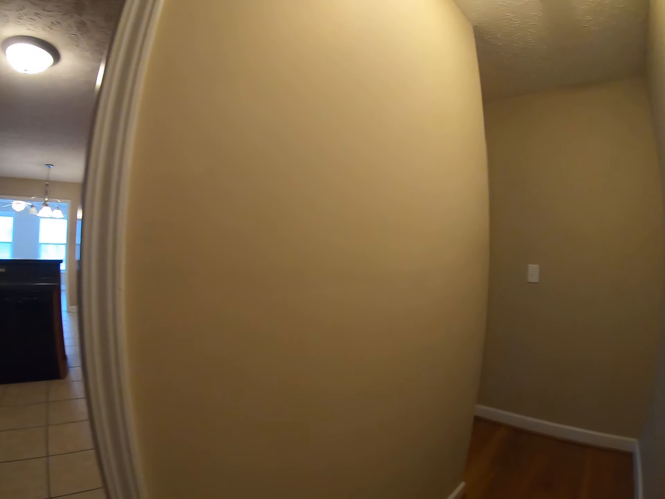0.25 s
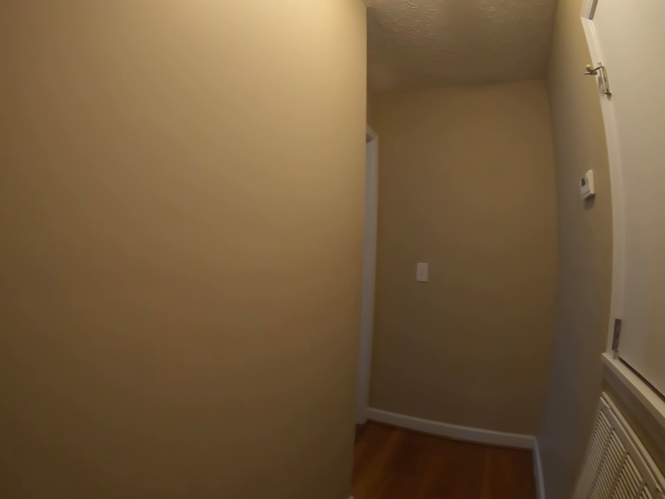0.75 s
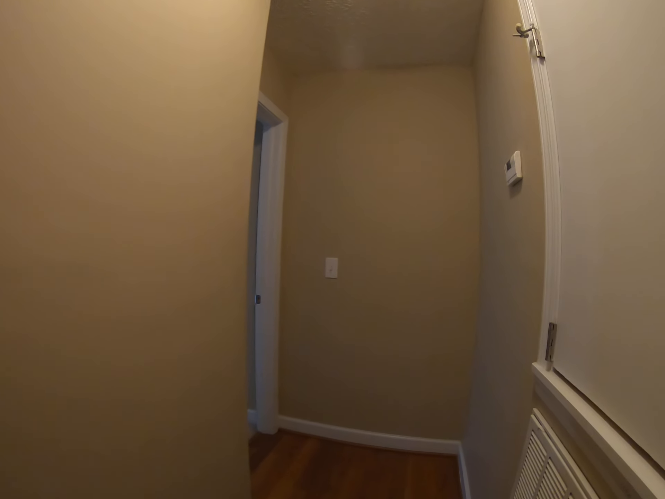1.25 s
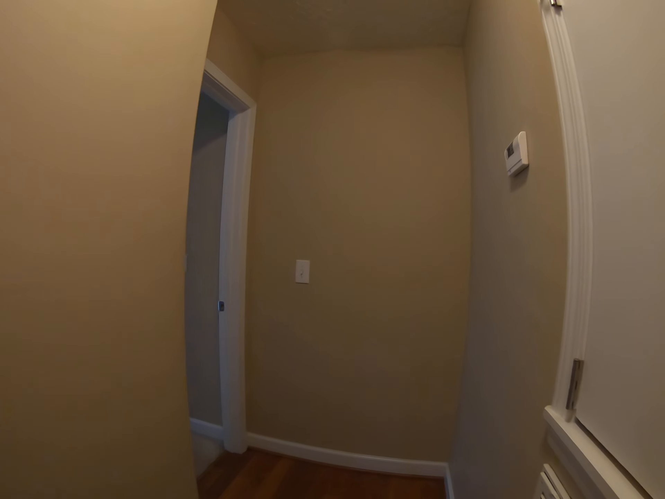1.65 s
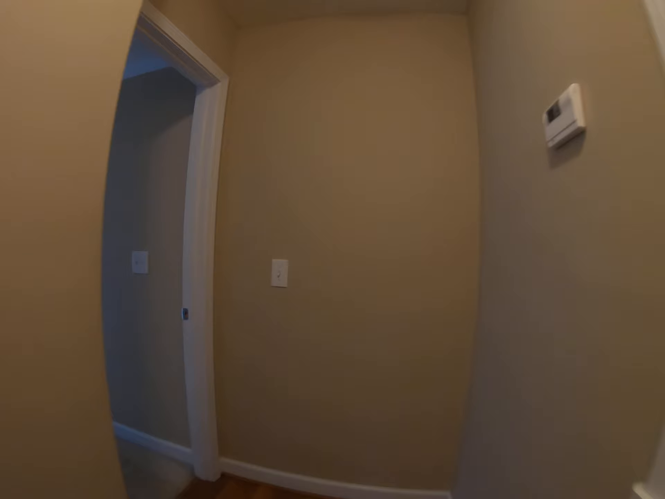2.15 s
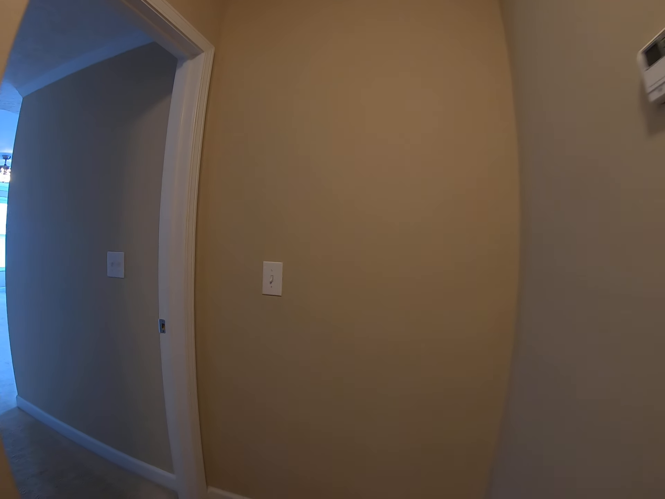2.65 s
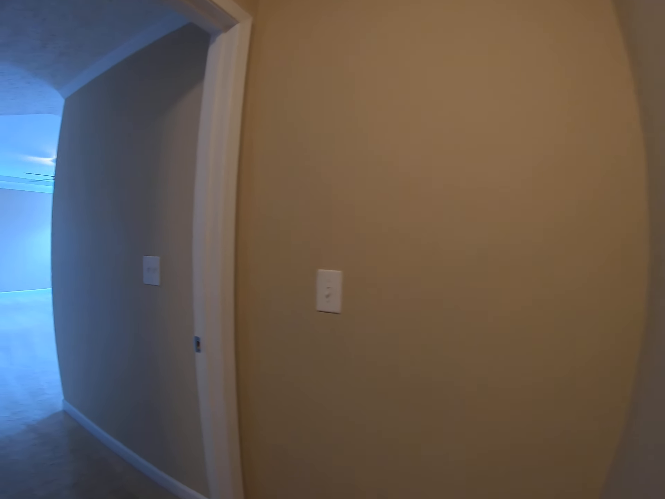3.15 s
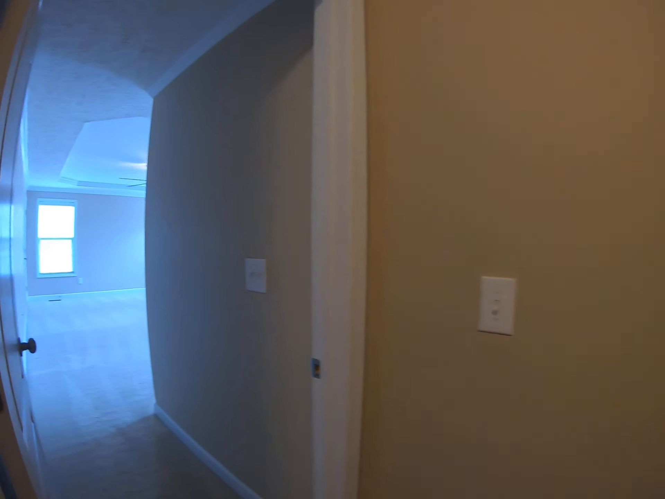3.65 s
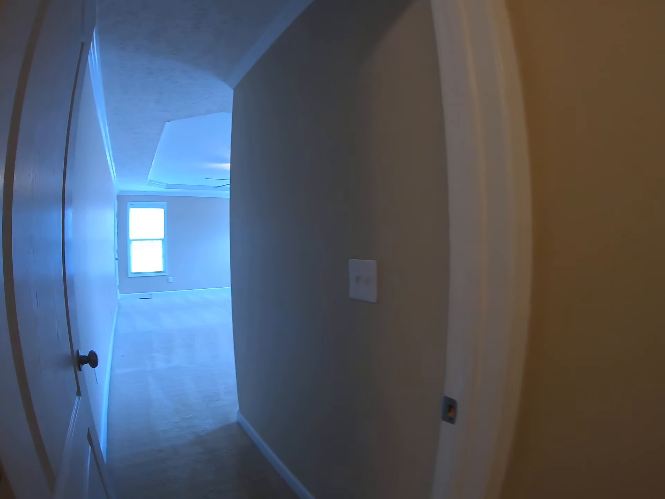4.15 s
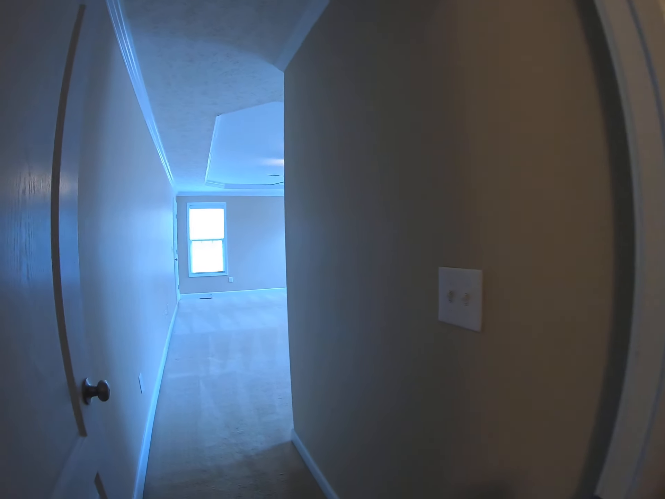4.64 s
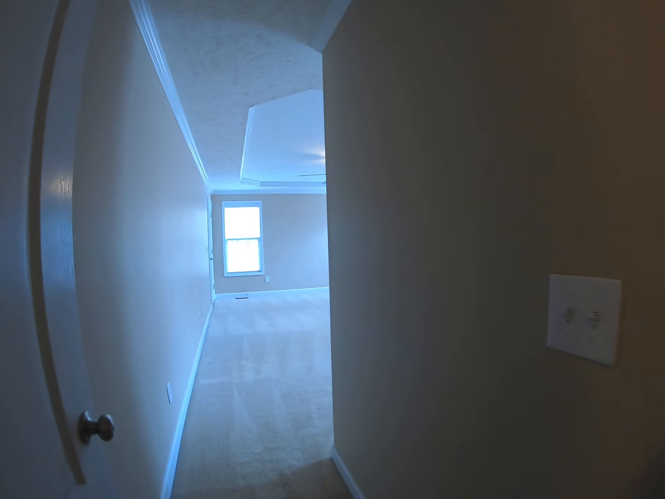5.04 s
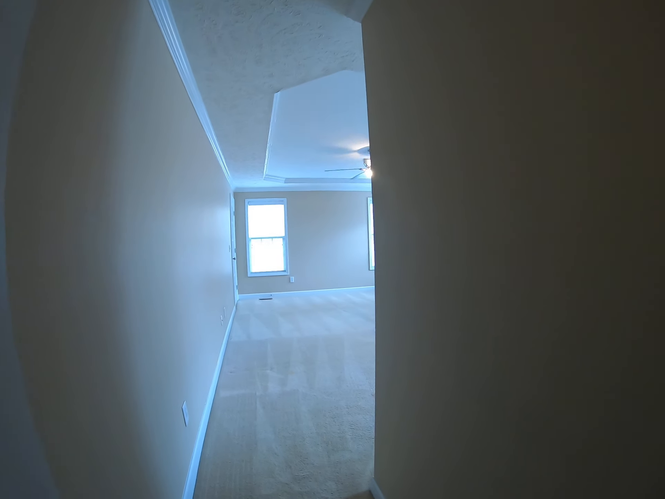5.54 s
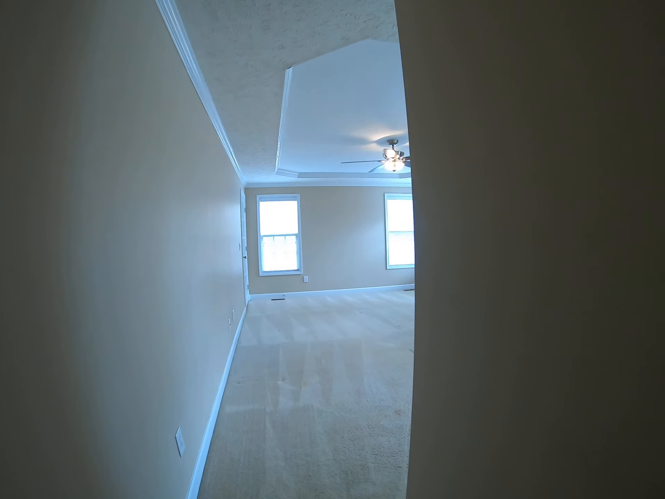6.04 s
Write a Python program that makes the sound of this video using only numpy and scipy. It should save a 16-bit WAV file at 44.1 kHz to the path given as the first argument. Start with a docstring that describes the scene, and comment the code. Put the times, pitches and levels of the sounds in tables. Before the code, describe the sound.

Slow, dull footsteps thud along a wooden hallway floor in an empty house, with shoe clicks and scuffs over a faint wavering high hum.

```python
"""A low ventilation rumble comes first; then someone walks slowly down the wooden hallway of an empty house.
Heel and forefoot thud on the sprung floor, made of decaying sine modes with knocks of grainy noise.
The shoes click, clack and scuff with bursts of noise, and the bare walls ring briefly.
Under it lie a far appliance's hum and a thin wavering tone near 1 kHz, probably the stabiliser motor
of a camera the walker carries. The rumble and hum fade as they are left behind."""
import sys
import numpy as np
from scipy import signal
from scipy.fft import rfft, irfft, next_fast_len
from scipy.io import wavfile

SR = 44100
rng = np.random.default_rng(int(sys.argv[2]) if len(sys.argv) > 2 else 0)


def generate_wav(sig):
    """Save sig (samples, or channels by samples) to the path in sys.argv[1] as 16-bit PCM at SR."""
    pcm = np.round(np.clip(np.atleast_2d(sig).T, -1, 1) * 32767).astype(np.int16)
    wavfile.write(sys.argv[1], SR, pcm)


N = 277429
TIME = np.arange(N) / SR  # seconds


def gain_of(db):
    """Turns decibels into an amplitude factor."""
    return 10 ** (np.asarray(db) / 20)


def evened(x):
    """Scales a signal to an rms (average strength) of 1."""
    return x / np.sqrt(np.mean(x ** 2) + 1e-20)


def read(points, hz):
    """Reads a table between its points, over log frequency."""
    table_hz, value = np.transpose(points)
    return np.interp(np.log(hz + 1), np.log(table_hz + 1), value)


def add(mix, s, sound):
    """Mixes a sound in, starting at s seconds."""
    part = mix[..., max(round(s * SR), 0):][..., :sound.shape[-1]]
    part += sound[..., :part.shape[-1]]


def coloured(x, points, tilt_db=0):
    """Filters by a table of levels, tilted in dB per octave; white noise keeps its power."""
    size = next_fast_len(x.shape[-1] + 2048)
    hz = np.fft.rfftfreq(size, 1 / SR)
    gain = gain_of(read(points, hz) + tilt_db * np.log2(hz + 1))
    return irfft(rfft(x, size) * evened(gain), size)[..., :x.shape[-1]]


def paired(x, alike):
    """Blends two unrelated channels to a given likeness in each band."""
    size = next_fast_len(x.shape[-1])
    a, b = rfft(x, size)
    same = np.clip(read(alike, np.fft.rfftfreq(size, 1 / SR)), -1, 1)
    mid = a * np.sqrt((1 + same) / 2)
    side = b * np.sqrt((1 - same) / 2)
    return irfft(np.array([mid + side, mid - side]), size)[:, :x.shape[-1]]


def drift(per_s):
    """Random wandering of rms 1 that picks a new target per_s times a second."""
    knots = rng.standard_normal(4096)
    return evened(np.interp(TIME * per_s, np.arange(len(knots)), knots))


def wandering_tone(hz, waver_hz):
    """A complex tone whose pitch wavers at random."""
    return np.exp(2j * np.pi * np.cumsum(hz + waver_hz * drift(per_s=30)) / SR)


# How alike left and right are in the room. Each row: frequency in Hz, likeness (1 is identical).
ROOM_ALIKE = [(100, 0.98), (220, 0.99), (450, 0.91), (900, 0.52), (2000, 0.53), (3600, 0.72), (5500, 0.45),
              (9000, 0)]


def grit(count, spread_db):
    """Two channels of noise broken into half-millisecond grains of uneven size."""
    grain_sizes = gain_of(spread_db * rng.standard_normal(count // 22 + 1))
    sizes = np.repeat(grain_sizes, 22)[:count]
    return evened(paired(rng.standard_normal((2, count)), ROOM_ALIKE) * sizes)


def ring(modes, scale, contact_s):
    """Floor modes swell over the contact time, then die away; the peak is 1."""
    t = np.arange(SR // 2) / SR
    wave = 0
    for hz, db, t60 in modes:
        wave = wave + gain_of(db - 60 * t / t60) * np.sin(2 * np.pi * hz * scale * t)
    wave = wave * (1 - np.exp(-(t / contact_s) ** 2))
    return -wave / abs(wave).max()


# How long the bare hallway rings. Each row: frequency in Hz, time to fall by 60 dB in seconds.
HALLWAY_RING = [(70, 0.11), (160, 0.71), (400, 1), (1000, 0.39), (2500, 0.71), (5000, 0.8), (9000, 0.54),
                (14000, 0.41)]


def hall(x, gap_s):
    """Dense reflections from bare walls build up over the gap; each band dies at its own speed."""
    noise = paired(rng.standard_normal((2, SR)), ROOM_ALIKE)
    hz, t, bands = signal.stft(noise, SR, nperseg=512)
    fade = gain_of(-60 * t / read(HALLWAY_RING, hz)[:, None])
    tail = signal.istft(bands * fade, SR, nperseg=512)[1]
    tail = tail * (1 - np.exp(-(TIME[:tail.shape[1]] / gap_s) ** 2))
    return signal.fftconvolve(np.atleast_2d(x), tail / np.linalg.norm(tail[0]), axes=1)[:, :N]


# The steps, with levels before the trims of each layer. Each row: heel strike in seconds, heel level in dB,
# level in dB as the foot rolls flat, roll from heel to ball in seconds, ball level in dB,
# knock of the ball in dB, pitch of the ball's clack in Hz, board pitch in Hz, give of the joists in dB.
STEPS = [(0.414, -28, -37, 0.15, -34.5, -45.5, 685, 167.3, -2.5),
         (1.241, -19, -34, .11, -23.5, -43, 1280, 160.6, -6),
         (2.012, -15.5, -47, .104, -27.5, -43, 770, 127, -15),
         (2.728, -24.5, -37.5, .137, -30.5, -44, 782, 160.4, -2.5),
         (3.5, -35, -45, 0.1, -26, -41, 830, 153, -2.5),
         (4.315, -20.5, -33.5, .151, -26, -49, 480, 145.7, -3.5),
         (5.116, -19.5, -27, .105, -31, -44.5, 1010, 192.2, -12),
         (5.968, -39.5, -49, 0.081, -39.5, -72, 695, 149.5, -1.5)]
# woody knock under the cushioned heel and under a mere shift of weight, relative to the thud
HEEL_KNOCK_DB, SHIFT_KNOCK_DB = -25.5, -25
FLAT_SHARE = 0.51  # how far through the roll the foot goes flat
FLOOR_HZ = 147.1  # a flat foot spreads its weight over many boards and rings the floor's main pitch
# the whole weight comes onto the front foot: typical delay after the heel, level relative to the ball
SETTLE_S, SETTLE_DB = .335, -15


def footfalls():
    """Each step loads the floor four times; rows of (s, board dB, joist dB, knock dB, board pitch Hz)."""
    rows = []
    for s, heel_db, flat_db, roll_s, ball_db, ball_knock_db, _, spot_hz, give_db in STEPS:
        settle_s = s + SETTLE_S + rng.uniform(-.02, 0.023)
        heel = s, heel_db, heel_db + HEEL_KNOCK_DB, spot_hz
        flat = s + FLAT_SHARE * roll_s, flat_db, flat_db + SHIFT_KNOCK_DB, FLOOR_HZ
        ball = s + roll_s, ball_db, ball_knock_db, spot_hz
        settle = settle_s, ball_db + SETTLE_DB, ball_knock_db + SETTLE_DB, FLOOR_HZ
        for at, db, knock_db, hz in (heel, flat, ball, settle):
            rows.append((at, db, db + give_db, knock_db, hz))
    return rows


# The boards under the foot. Each row: multiple of the board pitch, level in dB, time to fall 60 dB in seconds.
BOARDS = [(.8, -3, 0.089), (1.0, 6, 0.076), (1.33, -5, 0.095), (1.6, -5.5, 0.064)]
# Slow bending of the joists. Each row: frequency in Hz before scaling, level in dB, time to fall 60 dB in seconds.
JOISTS = [(62.8, -12, 0.92), (77.5, 6.5, 0.17), (103.5, 11, 0.11)]
# The soft sole spares the upper modes. Each row: frequency in Hz, gain in dB.
SOLE = [(20, -27), (35, 1), (50, -4.5), (75, 1), (100, -3), (230, 2), (290, -2), (360, -60), (700, -35)]


def thuds(falls):
    """Each footfall bends the joists and rings the boards, whose pitch depends on the spot."""
    out = np.zeros(N)
    lead_s = .005  # the floor starts to give just before the full weight lands
    for s, board_db, joist_db, _, hz in falls:
        add(out, s - lead_s, gain_of(board_db - 2.5) * ring(BOARDS, hz, contact_s=0.0068))
        add(out, s - lead_s, gain_of(joist_db) * ring(JOISTS, 0.838, contact_s=0.0066))
    size = next_fast_len(N + 4096)
    hz = np.fft.rfftfreq(size, 1 / SR)
    # one echo: a round trip of 0.01362 s between floor and ceiling
    ceiling = 1 + gain_of(-9.0) * np.exp(-2j * np.pi * hz * 0.01362)
    out = irfft(rfft(out, size) * ceiling * gain_of(read(SOLE, hz)), size)[:N]
    return out + gain_of(-7.0) * hall(out, gap_s=0.032)


# Colour of the knock's crunch. Each row: frequency in Hz, relative level in dB per Hz.
KNOCK_COLOUR = [(150, -10), (280, 8), (450, -4.5), (750, -4), (1100, -7.5), (1400, -19), (1900, -13.5),
                (3500, -24), (8000, -43)]
# The hard surface of the flooring. Each row: frequency in Hz before a random scaling, level in dB,
# time to fall 60 dB in seconds.
SURFACE = [(435, -10, 0.19), (611, 2.5, 0.028), (815, -4.5, 0.034), (1067, -16, .04), (1368, -9.5, 0.098)]


def knocks(falls):
    """The sole's contact rings the floor's surface with a short woody knock and a little crunch."""
    out = np.zeros((2, N))
    t = TIME[:8192]
    stroke = (1 - np.exp(-t / 0.0039)) * np.exp(-t / 0.02)
    for s, _, _, knock_db, _ in falls:
        add(out, s - .002, gain_of(knock_db + 1.5) * stroke * grit(len(t), spread_db=2.5))
    out = coloured(out, KNOCK_COLOUR)
    for s, _, _, knock_db, _ in falls:
        knock = ring(SURFACE, rng.uniform(0.91, 1.13), contact_s=0.0021)
        add(out, s - .001, gain_of(knock_db + 1.0) * knock)
    return out + gain_of(-2.0) * hall(out, gap_s=0.0025)


# The shoes snap as they flex. Each row: start in seconds, body level in dB, treble level in dB, before trims.
CLICKS = [(0.549, -38.5, -60), (0.661, -52, -55.5), (1.307, -41, -49.5), (1.464, -40, -61),
          (1.4771, -38, -50), (1.746, -45.5, -66), (2.0214, -46, -51), (2.8024, -42, -55),
          (2.9527, -48, -60), (3.5588, -51, -58), (3.603, -39, -53), (4.3899, -39, -56.5),
          (4.568, -42.5, -46.5), (5.118, -39, -57), (5.221, -45, -58.5), (5.2727, -51, -58.5),
          (5.293, -46, -58), (5.3734, -51, -60), (6.1238, -71, -67)]
# Colours of the snap's body and of its treble. Each row: frequency in Hz, relative level in dB per Hz.
CLICK_BODY = [(200, 7), (600, -2.5), (1500, 1.5), (3200, -5.5), (5000, -8), (10000, -45), (15000, -47)]
CLICK_EDGE = [(1500, -8), (3500, -34), (5000, 0.5), (7500, 3.5), (9300, 2), (11000, -16), (15000, -27)]
RESNAP_S, RESNAP_DB = .0065, -1  # every snap is followed by a second one: delay, level


def clicks():
    """A shoe snaps twice in quick succession as grainy noise, and the near walls scatter the snap."""
    body, edge = np.zeros((2, N)), np.zeros((2, N))
    t = TIME[:4096]
    crack, onset = np.exp(-t / .0025), 1 - np.exp(-t / .0006)
    snap = onset * (crack + gain_of(-4) * np.exp(-t / 0.026))
    snap = snap + gain_of(RESNAP_DB) * np.interp(t - RESNAP_S, t, onset * crack)
    for s, body_db, edge_db in CLICKS:
        add(body, s, gain_of(body_db - 5.5) * snap * grit(len(t), spread_db=7.0))
        add(edge, s, gain_of(edge_db + 1.0) * snap * grit(len(t), spread_db=5.0))
    out = coloured(body, CLICK_BODY) + coloured(edge, CLICK_EDGE)
    return out + gain_of(-1.0) * hall(out, gap_s=0.0017)


# The soles scuff as they slide and peel off. Each row: peak in seconds, level in dB, rise in seconds,
# fall in seconds, squeak pitch in Hz, squeak level in dB.
SCUFFS = [(0.682, -51.5, 0.022, 0.087, 5750, -63.5), (1.325, -49, 0.057, .032, 1540, -55),
          (1.487, -44, 0.015, 0.026, 1570, -51), (2.238, -42, 0.035, 0.024, 2140, -62),
          (3.003, -43.5, 0.025, 0.034, 2320, -56.5), (3.755, -38.5, 0.018, 0.024, 5540, -52),
          (4.598, -45.5, 0.011, .02, 1990, -59), (5.343, -47.5, 0.03, 0.021, 2460, -56),
          (5.373, -46, 0.017, 0.012, 3120, -66), (5.993, -66.5, 0.025, 0.045, 1670, -66)]
# the slower a scuff swells, the duller it is: tilt per octave at no rise time, loss per second of rise
SCUFF_TILT_DB, SCUFF_DULLING_DB_PER_S = 2, 58
# the ball lands with a brief hard clack: its noise and its pitched part, in dB relative to the knock
CLACK_DELAY_S, CLACK_RISE_S, CLACK_FALL_S, CLACK_NOISE_DB, CLACK_PITCH_DB = 0.00405, 0.0039, 0.0077, -19, -5
CLACK_TILT_DB = 1.5  # brightness of the clack's noise, per octave


def scuffs_and_clacks():
    """Soles peel off and land; rows of (s, dB, rise s, fall s, tilt dB per octave, pitch Hz, pitched dB)."""
    rows = []
    for s, db, rise_s, fall_s, hz, squeak_db in SCUFFS:
        tilt_db = SCUFF_TILT_DB - SCUFF_DULLING_DB_PER_S * rise_s
        rows.append((s, db, rise_s, fall_s, tilt_db, hz, squeak_db))
    for s, _, _, roll_s, _, knock_db, hz, _, _ in STEPS:
        rows.append((s + roll_s + CLACK_DELAY_S, knock_db + CLACK_NOISE_DB, CLACK_RISE_S, CLACK_FALL_S,
                     CLACK_TILT_DB, hz, knock_db + CLACK_PITCH_DB))
    return rows


# Colour of the noise in scuffs and clacks. Each row: frequency in Hz, relative level in dB per Hz.
SCUFF_COLOUR = [(150, 11.5), (450, -8), (900, 4.5), (1500, -2), (2400, 0.5), (3500, -3), (4800, -4.5),
                (6300, -6), (8000, -4), (9500, -8.5), (11000, -23.5), (15000, -33.5)]
CATCH_DB = 2.3  # a sliding sole catches and lets go: spread of the level


def sole_noises():
    """Grains swell and fall as a sole slides or clacks down; they excite a short rough squeak or pitched clack."""
    out = np.zeros((2, N))
    t = TIME[:SR // 2] - 1 / 4  # zero at the peak
    for s, db, rise_s, fall_s, tilt_db, pitch_hz, pitched_db in scuffs_and_clacks():
        swell = np.exp(-abs(t) / np.where(t < 0, rise_s, fall_s))
        uneven = swell * gain_of(CATCH_DB * drift(per_s=150)[:len(t)])
        grains = uneven * grit(len(t), spread_db=1.0)
        cycles = pitch_hz * TIME[:2048]
        chirrup = np.exp(-cycles / 4) * np.sin(2 * np.pi * cycles)  # dies within a few cycles
        chirrup = chirrup[None] / np.linalg.norm(chirrup)
        add(out, s + t[0], gain_of(db) * coloured(grains, SCUFF_COLOUR, tilt_db))
        add(out, s + t[0], gain_of(pitched_db) * signal.fftconvolve(grains, chirrup, axes=1))
    return out + gain_of(-6) * hall(out, gap_s=0.0014)


# The whine as the motor works against the sway. Each row: time in seconds, level in dB before the gain below.
WHINE = [(0, -73.5), (0.55, -63.5), (0.8, -55.5), (1.15, -53.5), (1.5, -66), (2.7, -59.5), (3.2, -54.5),
         (4.1, -51.5), (4.6, -57.5), (5.2, -55), (6.29, -59)]
# The motor's rush in the camera body. Each row: frequency in Hz, relative level in dB per Hz.
MOTOR_RUSH = [(400, -19.5), (750, -51), (920, -16), (1010, 3.5), (1090, 5), (1170, 7), (1265, -5.5),
              (1380, -33), (1700, -18), (2600, -70)]
# Faint whistles of the electronics. Each row: frequency in Hz, level in dB.
WHISTLES = [(2002, -74), (6998, -90), (7736, -86)]
# the pitch sags slowly from about WHINE_HZ, and further under load
WHINE_GAIN_DB, WHINE_HZ, SAG_HZ_PER_S, SAG_HZ_PER_DB = 3.5, 991, 1.2, .5


def motor():
    """A wavering whine and a narrow rush shake the two channels in nearly opposite directions."""
    db = np.interp(TIME, *np.transpose(WHINE)) + WHINE_GAIN_DB
    hz = WHINE_HZ - SAG_HZ_PER_S * TIME - SAG_HZ_PER_DB * (db - db.mean())
    whine = gain_of(db + 2.0 * drift(per_s=20)) * wandering_tone(hz, waver_hz=4.7)
    rush = signal.hilbert(coloured(rng.standard_normal(N), MOTOR_RUSH), next_fast_len(N))[:N]
    rush = gain_of(-47.5 + 1.15 * drift(per_s=30)) * rush
    whistles = sum(gain_of(db) * wandering_tone(hz, waver_hz=3.94) for hz, db in WHISTLES)
    # complex factors turn the phase, in radians
    right = whine * gain_of(0.5) * np.exp(-2.35j) + rush * gain_of(-2.3) * np.exp(-2.75j)
    return np.array([whine + rush + whistles, right + 1j * whistles]).real


# The still house. Each row: frequency in Hz, relative level in dB per Hz.
AIR_COLOUR = [(25, -5), (55, -18), (78, -10), (105, -27.5), (150, 3), (190, -2), (250, -11), (500, -15.5),
              (900, -11), (1500, -18), (2500, -26.5), (6000, -31.5), (8500, -28), (9700, -36),
              (11000, -47.5), (15000, -64)]
# How alike left and right are in that air. Each row: frequency in Hz, likeness (negative is opposed).
AIR_ALIKE = [(60, 0.97), (180, 0.85), (400, 0.5), (700, -0.38), (1400, 0.11), (2200, 0.3), (3800, 0.37),
             (6000, 0.0018)]
# A kitchen appliance hums, left behind along the hall. Each row: frequency in Hz, level in dB at the start.
HUM = [(176, -55.5), (296, -64), (414, -69)]
RUMBLE_DB, RUMBLE_FADE_DB_PER_S = 5, 1.47  # the ventilation rumble is left behind too


def air():
    """Ventilation rumble and an appliance's hum fade with distance, under a steady faint hiss."""
    noise = paired(rng.standard_normal((2, N)), AIR_ALIKE)
    noise = evened(coloured(noise, AIR_COLOUR))
    low = signal.sosfiltfilt(signal.butter(2, 500, fs=SR, output="sos"), noise)
    hiss = noise - low
    rumble = low * gain_of(RUMBLE_DB - RUMBLE_FADE_DB_PER_S * TIME + 1.6 * drift(per_s=9))
    hum = 0
    for hz, db in HUM:
        hum = hum + gain_of(db + 2.5 * drift(per_s=7)) * wandering_tone(hz, waver_hz=5).real
    return gain_of(-56.0) * (hiss + rumble) + hum * gain_of(-2.5 * TIME)


HANDLING_DB, HANDLING_RISE_DB_PER_S = -71.5, 3  # the hand grows less steady along the way


def handling():
    """The moving hand shakes the camera with a lumpy low rumble."""
    band = signal.butter(3, [18, 62], "bandpass", fs=SR, output="sos")
    rumble = evened(signal.sosfilt(band, rng.standard_normal(N)))
    return rumble * gain_of(HANDLING_DB + HANDLING_RISE_DB_PER_S * TIME + 2 * drift(per_s=9.8))


def scene():
    """Footsteps, slightly louder on the right, over the hum of the house and the camera."""
    falls = footfalls()
    floor = (thuds(falls) + knocks(falls)) * gain_of([[-.4], [.4]])
    shoes = (clicks() + sole_noises()) * gain_of([[-1.1], [1.1]])
    return floor + shoes + air() + handling() + motor()


def record(dry):
    """Takes away the treble above about 15.5 kHz."""
    low_pass = signal.firwin(511, 15500, window=("kaiser", 9), fs=SR)
    return signal.oaconvolve(dry, low_pass[None], "same")


dry = scene()
out = record(dry)
generate_wav(out)
```